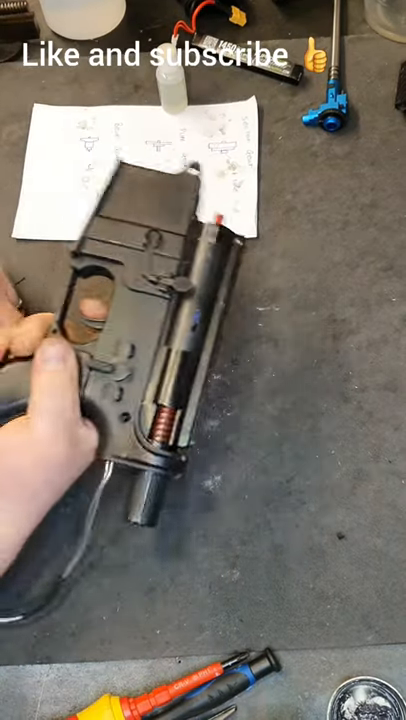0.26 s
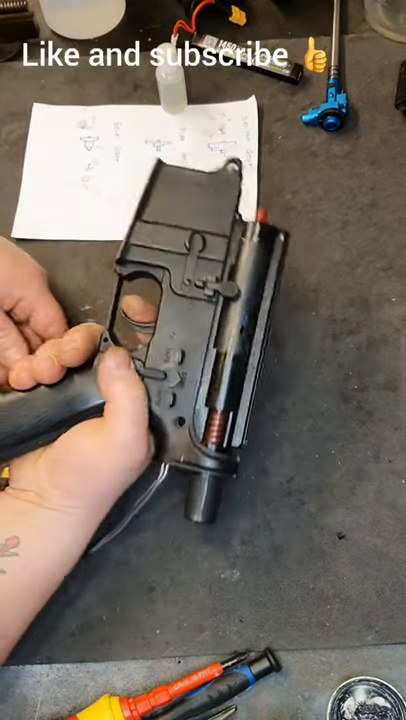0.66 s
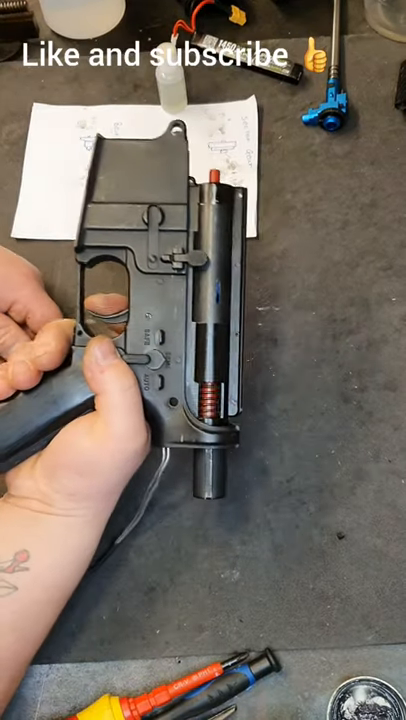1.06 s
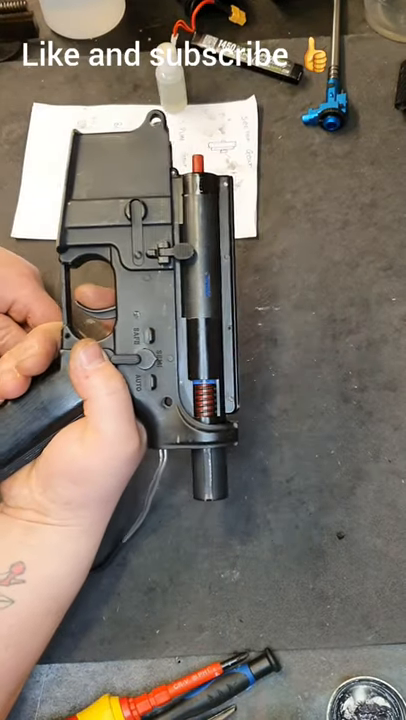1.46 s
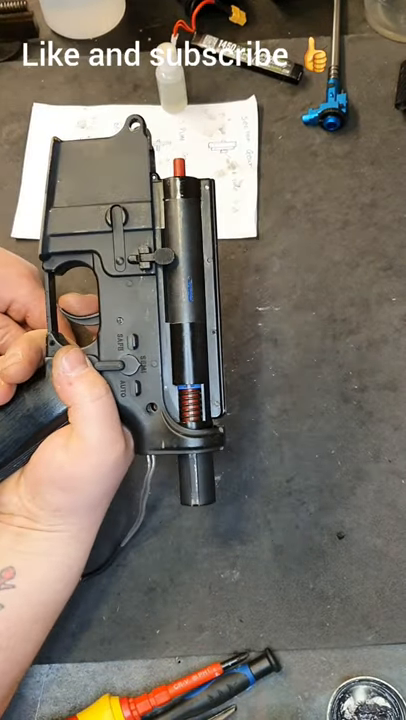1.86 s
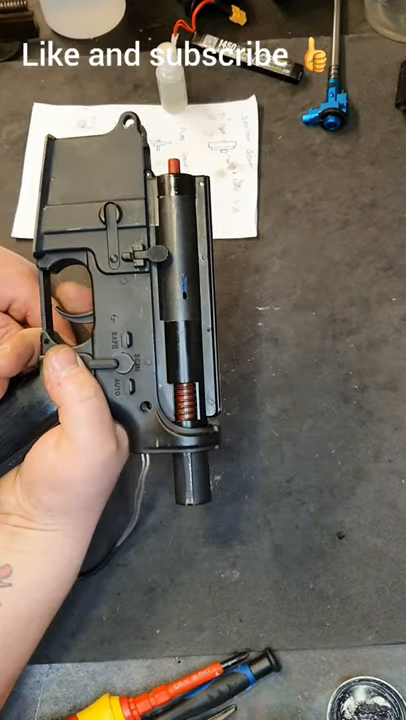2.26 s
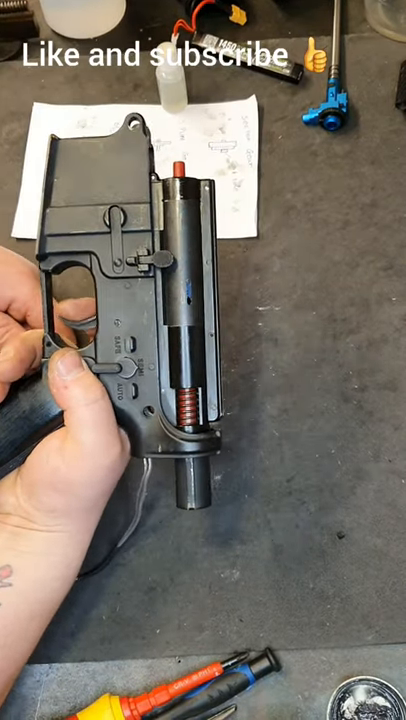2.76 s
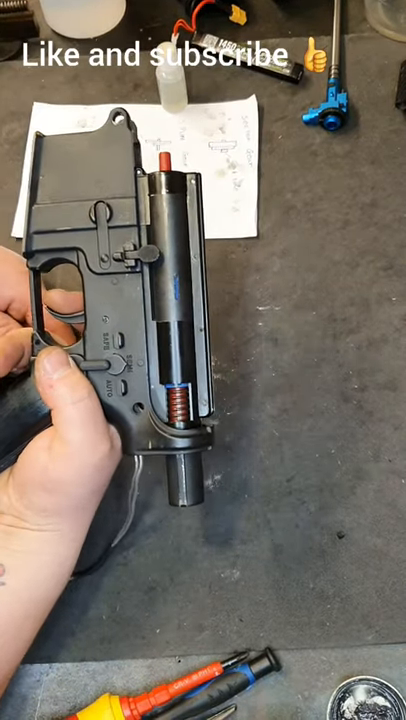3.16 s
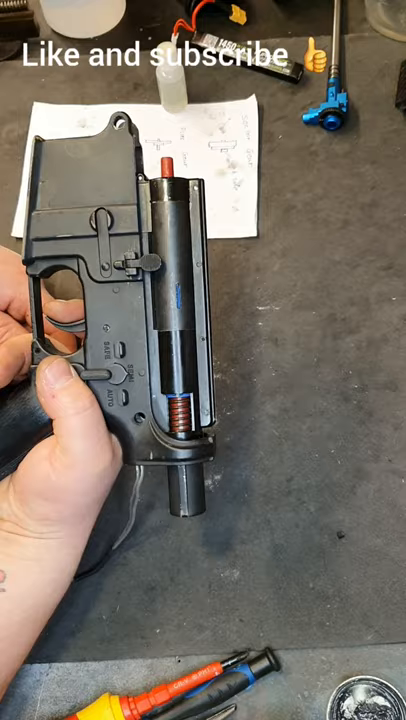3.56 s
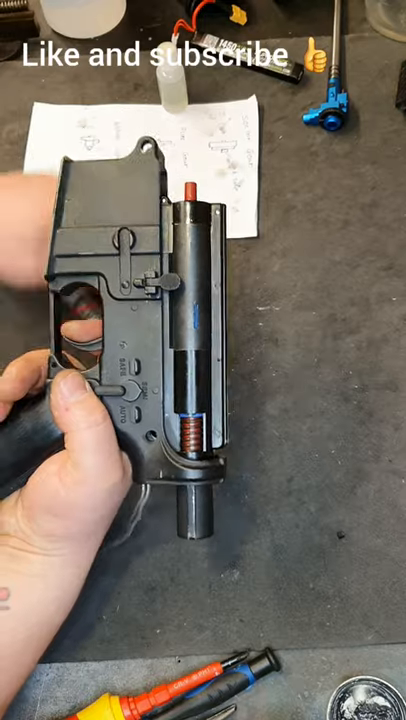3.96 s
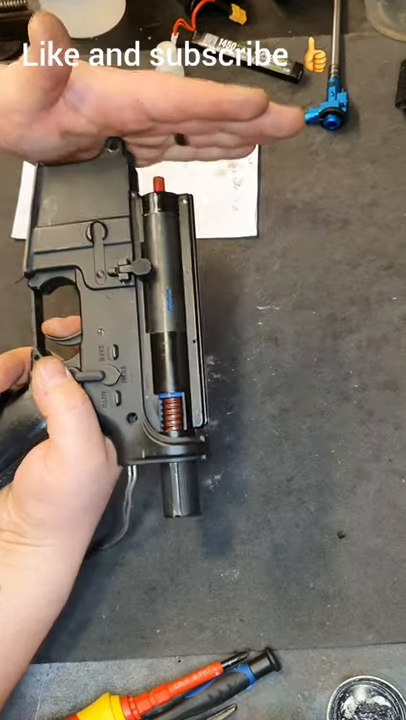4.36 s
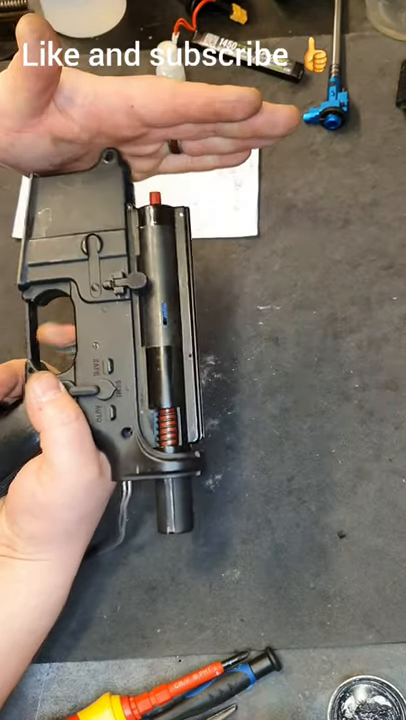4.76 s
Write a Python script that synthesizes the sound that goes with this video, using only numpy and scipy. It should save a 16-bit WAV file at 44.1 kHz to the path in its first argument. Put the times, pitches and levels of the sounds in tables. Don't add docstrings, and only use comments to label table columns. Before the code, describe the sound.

Four separate dry clacks with brief metallic gear buzz from an electric toy gun mechanism, with faint cloth rustle and a soft hand thud before the last.

```python
import sys
import numpy as np
from scipy import signal
from scipy.fft import rfft, irfft, next_fast_len
from scipy.io import wavfile
from scipy.ndimage import uniform_filter1d

SR = 44100
rng = np.random.default_rng(int(sys.argv[2]) if len(sys.argv) > 2 else 0)


def linear_from_db(decibels):
    return 10 ** (np.asarray(decibels, float) / 20)


def dump_mix(stems):
    frames = np.atleast_2d(stems).T
    limited = np.clip(frames, -1, 1)
    pcm = np.round(limited * 32767).astype(np.int16)
    wavfile.write(sys.argv[1], SR, pcm)


N = 220852

# motor start, spring let go, latch stops the gears, full load, all in seconds.
CYCLES = [
    (1.152, 1.193, 1.29, 1.179),
    (2.033, 2.067, 2.159, 2.061),
    (2.827, 2.866, 2.962, 2.856),
    (4.629, 4.664, 4.767, 4.658),
]
# centre in Hz, width in Hz, level in dB.
GEAR_RING = [(2990, 170, -5), (3550, 170, -4), (3910, 190, 0), (4440, 220, -3), (5300, 700, -11),
             (6840, 300, -11)]
# centre in Hz, width in Hz, level in dB.
SHELL = [(708, 55, 2), (1000, 220, -8.5), (1340, 110, -7.5), (1566, 73, -2.5), (1926, 100, -1.5),
         (2220, 110, -2.5)]
# centre in Hz, width in Hz, level in dB.
BENCH_THUMP = [(117, 67, 0), (184, 97, -1), (286, 20, -2), (410, 44, -9.5)]


def gears():
    # frequency in Hz, level in dB per Hz.
    mesh_color = [(120, -36.5), (200, -9), (274, -10.5), (728, -9), (1240, -12), (1360, -4.5), (2800, -3),
                  (3910, -8), (7600, -10.5), (15000, -12.5), (16500, -32.5)]
    knocks, load = shaft_knocks(top_hz=300.0, spin_up=.018, jitter=.15)
    knocks = np.array([knocks, np.roll(knocks, shift=40)])
    rattle = unit(rng.standard_normal((4, 2, N)) * linear_from_db(3 * rng.standard_normal((4, 2, N))))
    ring_gain, shell_gain, hiss_gain = levels(gear_stages(), fade=.003)

    drive = load * knocks + np.sqrt(1 - load ** 2) * rattle[0]
    slack = 0.49 * load * knocks + rattle[1]
    knock_tail = signal.lfilter([1], [1, -np.exp(-1 / (0.00074 * SR))], knocks)
    burst = 1 + 0.77 * unit(knock_tail)

    def played(excitation, gain, response):
        sound = filtered(gain * excitation, response)
        power = np.mean(np.abs(response(np.arange(SR // 2))) ** 2)
        return sound / np.std(excitation) / np.sqrt(power)

    ring = linear_from_db(-2.0) * played(drive, ring_gain, modes(GEAR_RING))
    shell = linear_from_db(-2.5) * played(slack, shell_gain, modes(SHELL))
    mesh = linear_from_db(4.5) * played(burst * rattle[2], hiss_gain, lambda f: linear_from_db(along(mesh_color, f)))
    bench = linear_from_db(-13.5) * played(rattle[3], hiss_gain, modes(BENCH_THUMP))
    return ring + shell + mesh + bench


def shaft_knocks(top_hz, spin_up, jitter):
    t, speed, load = np.arange(N) / SR, np.full(N, 150.), np.full(N, .5)
    for start, let_go, stop, _ in CYCLES:
        running = (t > start) & (t < stop)
        speed[running] += top_hz * (1 - np.exp(-(t[running] - start) / spin_up))
        load[(t > start + .008) & (t < let_go)] = 0.63
    wobble = unit(uniform_filter1d(rng.standard_normal(N), size=60))
    turns = np.cumsum(speed / SR * (1 + jitter * wobble))
    new_turn = np.diff(np.floor(turns), prepend=0) > 0
    knocks = new_turn * linear_from_db(2.23 * rng.standard_normal(N))
    return knocks * np.sqrt(SR / speed), np.clip(load, 0, 1)


def gear_stages():
    # teeth catch again in seconds, winding effort in dB,
    # take-up jolt in dB, running on in dB, settling fall in dB per second.
    run_on = [
        (1.237, 0, 5, 0.5, 500),
        (2.113, -2.5, -4.5, -0.5, 628),
        (2.908, -1, -5, 0.5, 685),
        (4.704, 3, 3, -0.5, 800),
    ]
    # gear ring, shell and mesh hiss in dB.
    first_db = (-33, -29, -42)
    jolt_level = (-21.5, -17.5, -38.5)
    full_load_db = (-10, -23.5, -25)
    release_db = (-15, -19.5, -19.5)
    free_db = (-27, -24, -24)
    slack_db = (-30.5, -30.5, -22.5)
    catch_db = (-16.5, -28.5, -24.5)
    coast_db = (-24.5, -30, -32.5)
    spent_db = (-36, -39.5, -44)
    settle_db = (-21.5, -25.5, -30.5)
    jolt_s, gap_before_s, gap_after_s = 0.0089, 0.0028, .01
    slack_s, coast_s = 0.0099, 0.018
    spent_s, settle_s, quiet_s = 0.0071, 0.0035, .09

    stages = []
    for (start, let_go, latch, loaded), (catch, effort_db, jolt_db, run_db, fall) in zip(CYCLES, run_on):
        winding = [(start, *np.add(first_db, jolt_db)),
                   (start + jolt_s, *np.add(jolt_level, jolt_db)),
                   (loaded, *np.add(full_load_db, effort_db)),
                   (let_go - gap_before_s, *np.add(release_db, effort_db))]
        free = [(let_go + gap_after_s, free_db), (catch - slack_s, slack_db),
                (catch, catch_db), (catch + coast_s, coast_db)]
        running = [(s, *np.add(db, run_db)) for s, db in free] + [(latch - spent_s, *spent_db)]
        settling = [(latch + settle_s, *settle_db),
                    (latch + settle_s + quiet_s, *np.subtract(settle_db, fall * quiet_s))]
        stages += [winding, running, settling]
    return stages


def clacks():
    # thump in dB and t60 in seconds for the kind,
    # then rows of start in seconds, peak in dB, brightness in dB.
    slam = (-21.5, .025), [(1.197, -8, -10), (2.07, -8.5, -4.5), (2.87, -7, -11.5), (4.666, -10, 0)]
    tappet = (-25.5, 0.0096), [(1.225, -9, -11.5), (1.242, -14, -12.5), (2.102, -15, -8.5),
              (2.113, -16.5, -19.5), (2.899, -11.5, -7.5), (4.698, -17, -5)]
    latch = (-36.5, 0.028), [(1.29, -15, -8), (1.303, -14.5, -10), (2.159, -16.5, -20),
             (2.962, -18.5, -16.5), (4.768, -14.5, -9)]
    # start in seconds, peak in dB.
    kicks = [
        (1.154, -10),
        (2.035, -17),
        (2.83, -12.5),
        (4.632, -9),
    ]
    crack, spit, push = np.zeros((2, N)), np.zeros((2, N)), np.zeros(N)
    t = np.arange(SR // 20) / SR
    contacts = [row + kind for kind, rows in (slam, tappet, latch) for row in rows]
    for s, db, bright_db, thump_db, t60 in contacts:
        add(crack, s, linear_from_db(db + 4) * snap(t60, [600, 5000], t))
        add(spit, s, linear_from_db(db + bright_db + 7.5) * snap(t60, [5000, 16000], t))
        add(spit, s, linear_from_db(db - 2) * snap(0.0016, [1200, 17500], t))
        add(push, s, linear_from_db(db + thump_db + 5.5 - 60 * t / 0.018))
    for s, db in kicks:
        add(crack, s, linear_from_db(db - 3.5) * snap(0.038, [500, 4500], t))
    ringing = linear_from_db(0.5) * filtered(crack, modes(SHELL + GEAR_RING))
    return crack + ringing + spit + filtered(push, modes(BENCH_THUMP))


def spring():
    # frequency in Hz, level in dB, t60 in seconds.
    steady_notes = [(8320, -72, .4), (8700, -74, .35)]
    # frequency in Hz, level in dB.
    settled_notes = [(8400, -65), (9200, -71), (9200, -69.5), (7800, -67)]
    out, t = np.zeros(N), np.arange(SR // 2) / SR
    for (_, _, stop, _), (hz, coil_db) in zip(CYCLES, settled_notes):
        notes = steady_notes + [(hz, coil_db, 0.56)]
        drift = np.cumsum(.012 * rng.standard_normal(len(t)))
        add(out, stop, sum(linear_from_db(db - 60 * t / t60) * np.sin(2 * np.pi * f * t + drift) for f, db, t60 in notes))
    return out


def hand():
    # start in seconds, peak in dB, knock in dB.
    landings = [
        (3.912, -30, -13),
        (3.925, -25.5, -31),
        (3.953, -26, -10.5),
        (3.96, -20.5, -14.5),
        (3.967, -20.5, -24),
        (3.989, -33, -14),
        (4.017, -24, -13),
        (4.027, -25.5, -16.5),
        (4.039, -25, -17),
        (4.068, -36, -10),
    ]
    # centre in Hz, width in Hz, level in dB.
    bench_top = [(79.2, 9.5, 2), (130.5, 18, -3), (195.4, 21, 3), (296, 43, -2.5), (370, 110, -7)]
    push, knock, t = np.zeros(N), np.zeros((2, N)), np.arange(SR // 20) / SR
    for s, db, knock_db in landings:
        add(push, s, linear_from_db(db + 13.5 - 60 * t / 0.014) * (1 - np.exp(-t / 0.0012)))
        add(knock, s, linear_from_db(db + knock_db + 15 - 60 * t / .035) * rng.standard_normal((2, len(t))))
    dull_knock = filtered(knock, lambda f: modes([(500, 550, 0)])(f) ** 2)
    return filtered(push, modes(bench_top)) + spread(dull_knock)


def taps():
    dull = -35.5, [(0.632, -35, 1880), (0.727, -39.5, 1130), (0.902, -36.5, 890), (0.952, -41.5, 1320),
            (1.021, -41.5, 1380), (1.472, -51.5, 1210), (1.548, -47.5, 1520), (1.613, -50, 1417),
            (1.667, -49, 1640), (1.735, -48.5, 2404), (1.955, -48, 1700), (2.292, -48, 1010),
            (2.374, -49, 1250), (2.479, -50.5, 1620), (2.657, -50.5, 1927), (2.782, -46.5, 1810),
            (3.349, -46.5, 1077), (4.069, -40, 1380), (4.445, -42, 1016), (4.581, -47.5, 1240),
            (4.959, -50.5, 1100)]
    crisp = -11, [(0.224, -37.5, 2080), (0.39, -40.5, 1180), (0.46, -54, 1540), (0.604, -39.5, 1720),
             (0.787, -40, 1180), (1.117, -47, 1280), (1.984, -47, 2360), (2.69, -52.5, 993),
             (4.272, -42, 983)]
    out, t = np.zeros((2, N)), np.arange(SR // 8) / SR

    def puff(hz, q):
        peak = signal.iirpeak(hz, q, SR)
        once = signal.lfilter(*peak, rng.standard_normal((2, len(t))))
        return unit(signal.lfilter(*peak, once))

    front = 1 - np.exp(-t / 0.00091)
    tail = linear_from_db(1.5 - 60 * t / 0.0076) + linear_from_db(-60 * t / 0.065) + linear_from_db(-2 - 60 * t / 0.18)
    for edge_db, rows in (dull, crisp):
        for s, db, hz in rows:
            body = puff(hz, q=0.41) + linear_from_db(edge_db) * puff(7200, q=2.1)
            add(out, s, linear_from_db(db - 8.0) * front * tail * body)
    return filtered(out, lambda f: 1 / (1 + 1j * f / 7000) ** 3)


def workshop():
    # time in seconds, level in dB.
    room_gain = [(0, -52), (.25, -51.5), (.68, -52.5), (1.1, -53.5), (1.25, -62.5), (1.97, -62.5),
                 (2.361, -61.5), (2.75, -62.5), (3.1, -65.5), (3.5, -66), (4.1, -60), (4.55, -58),
                 (4.85, -65.5), (5.01, -65)]
    # frequency in Hz, level in dB per Hz.
    rumble_color = [(12, -52.5), (20, -23.5), (37, -6), (80, 2), (156, -10.5), (179, -14), (282, -24),
                    (400, -28), (520, -70), (880, -120)]
    wash_color = [(120, -25), (200, -6), (322, -7.5), (722, -4), (851, -8.5), (1140, -7.5), (1270, -6),
                  (4040, -17), (4770, -25), (16000, -50.5)]
    cuff_color = [(1470, -30), (2500, 3), (4220, -4.5), (4780, -1.5), (5800, -1), (13600, -20),
                  (15800, -24.5)]
    cloth_color = [(290, -34), (500, -6), (561, -24.5), (586, -13.5), (687, -3), (1080, -5.5), (3620, -2.5),
                   (11800, -11.5), (15800, -18)]
    # full strength at in seconds, held in seconds, level in dB,
    # swell in dB per second, fade in dB per second.
    cuff_strokes = [
        (0, 0.021, -56, 300, 302),
        (.33, 0.032, -49.5, 226, 180),
        (.47, 0.0051, -54.5, 800, 150),
        (.606, .02, -63.5, 106, 69.5),
        (.826, .01, -54.5, 218, 240),
    ]
    arm_strokes = [
        (3.74, .11, -55.5, 550, 201),
        (3.956, 0.0017, -54.5, 1600, 505),
        (4.04, .01, -61, 109.8, 410),
    ]
    gain_db = np.interp(np.arange(N) / SR, *np.transpose(room_gain))
    cuff = strokes(cuff_strokes) * pair(cuff_color, patchy_db=1.5)
    arm = linear_from_db(1.5) * strokes(arm_strokes) * pair(cloth_color, patchy_db=3.0)
    rumble_db = -55 + 0.9 * (gain_db - gain_db.mean())
    rumble = linear_from_db(rumble_db) * pair(rumble_color, patchy_db=1.5)
    wash = linear_from_db(gain_db + 1.0) * pair(wash_color, patchy_db=3)
    return rumble + wash + cuff + arm


def strokes(rows):
    t, pressure = np.arange(N) / SR, 0
    for s, held, db, swell, fade in rows:
        pressure = pressure + linear_from_db(db - swell * np.maximum(s - t, 0) - fade * np.maximum(t - s - held, 0))
    return pressure


def pair(spectrum, patchy_db):
    z = signal.stft(rng.standard_normal((2, N)), nperseg=256)[2]
    field = uniform_filter1d(rng.standard_normal(z.shape[1:]), size=8, axis=0)
    field = uniform_filter1d(field, size=8, axis=1)
    two = signal.istft(z * linear_from_db(patchy_db * unit(field)), nperseg=256)[1][:, :N]
    return unit(spread(filtered(two, lambda hz: linear_from_db(along(spectrum, hz)))))


def scattered(x, decay, length):
    hz, t, z = signal.stft(rng.standard_normal((2, round(length * SR))), SR, nperseg=256)
    tail = signal.istft(z * linear_from_db(-60 * t / along(decay, hz)[:, None]), SR, nperseg=256)[1]
    return signal.fftconvolve(x[None], tail / np.linalg.norm(tail[0]), axes=1)[:, :N]


def spread(two, alike=None):
    # frequency in Hz, left-right likeness.
    room_alike = [(60, 1), (240, 0.89), (950, 0.05), (3770, -0.77), (15000, -1.1)]
    likeness = room_alike if alike is None else alike
    turn = lambda hz: np.arccos(np.clip(along(likeness, hz), 0, 1)) / 2
    mid, side = filtered(two, lambda hz: np.array([np.cos(turn(hz)), np.sin(turn(hz))]))
    return np.array([mid + side, mid - side])


def snap(t60, band_hz, t):
    burst = linear_from_db(-60 * t / t60) * (1 - np.exp(-t / 0.00037)) * rng.standard_normal((2, len(t)))
    burst = signal.sosfilt(signal.butter(2, band_hz, "band", fs=SR, output="sos"), burst)
    return burst / np.abs(burst).max(axis=1, keepdims=True)


def modes(table):
    def response(f):
        total = 0
        for k, (centre, width, db) in enumerate(table):
            damping = 1j * f * width
            total = total + (-1) ** k * linear_from_db(db) * damping / (centre * centre - f * f + damping)
        return total
    return response


def filtered(x, response):
    m = next_fast_len(N + SR // 2)
    return irfft(rfft(x, m) * response(np.fft.rfftfreq(m, 1 / SR)), m)[..., :N]


def levels(tables, fade):
    t, out = np.arange(N) / SR, 0
    for rows in tables:
        s, *cols = np.transpose(rows)
        gate = np.clip(np.minimum(t - s[0], (s[-1] - t) / 2) / fade + 1, 0, 1)
        out = np.maximum(out, gate * linear_from_db(np.array([np.interp(t, s, c) for c in cols])))
    return out


def along(points, hz):
    f, v = np.transpose(points)
    return np.interp(np.log(hz + 1), np.log(f + 1), v)


def unit(x):
    return x / np.sqrt(np.mean(x ** 2) + 1e-20)


def add(track, s, sound):
    part = track[..., round(s * SR):round(s * SR) + sound.shape[-1]]
    part += sound[..., :part.shape[-1]]


def scene():
    # frequency in Hz, left-right likeness.
    gun_alike = [(60, 1), (290, 0.94), (640, 0.65), (1400, 0.22), (3100, 0.041), (15000, .02)]
    # frequency in Hz, t60 in seconds.
    wall_decay = [(200, .18), (2000, 0.18), (5000, 0.12), (12000, 0.11)]
    gun = gears() + clacks() + spring()
    walls = linear_from_db(-14) * scattered(np.pad(gun[0], (300, 0)), wall_decay, length=.4)
    return spread(gun, gun_alike) + walls + hand() + taps() + workshop()


def low_pass(x):
    return signal.sosfilt(signal.butter(12, 16990, fs=SR, output="sos"), x)


def record(dry):
    limited = dry / (1 + np.abs(dry / .95) ** 6) ** (1 / 6)
    mix = filtered(limited, lambda f: 1 / (1 + (f / 15950) ** 120))
    return low_pass(mix)


dry = scene()
out = record(dry)
dump_mix(out)
```